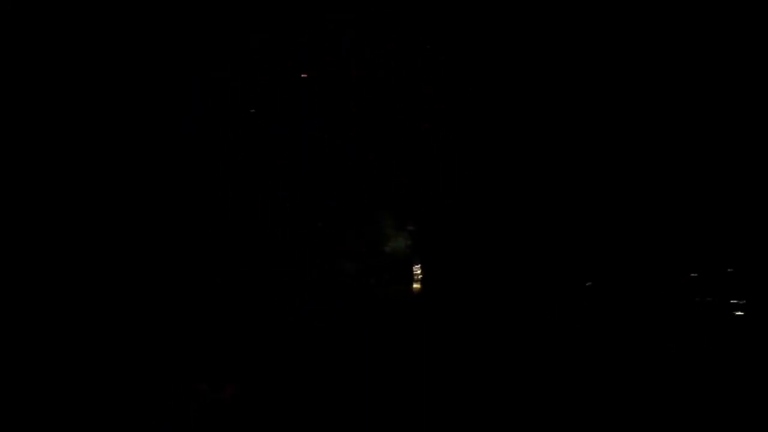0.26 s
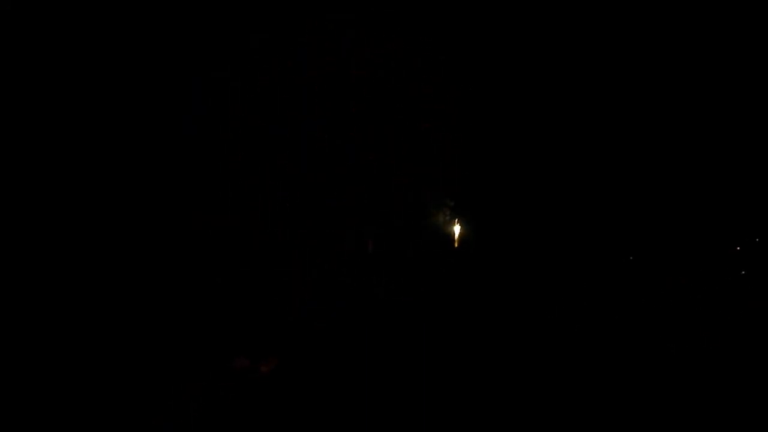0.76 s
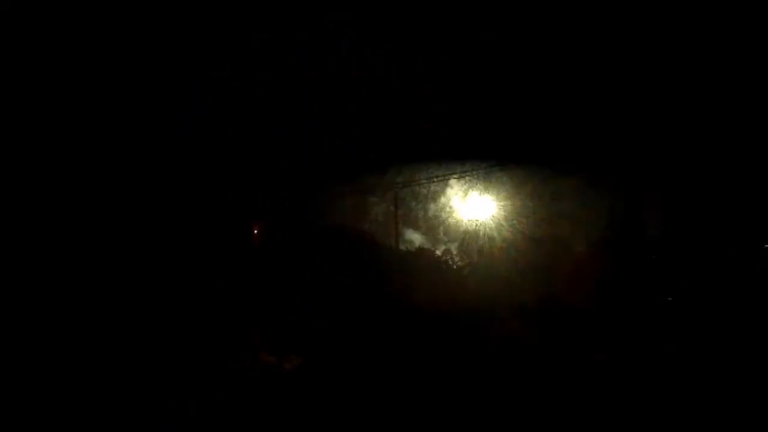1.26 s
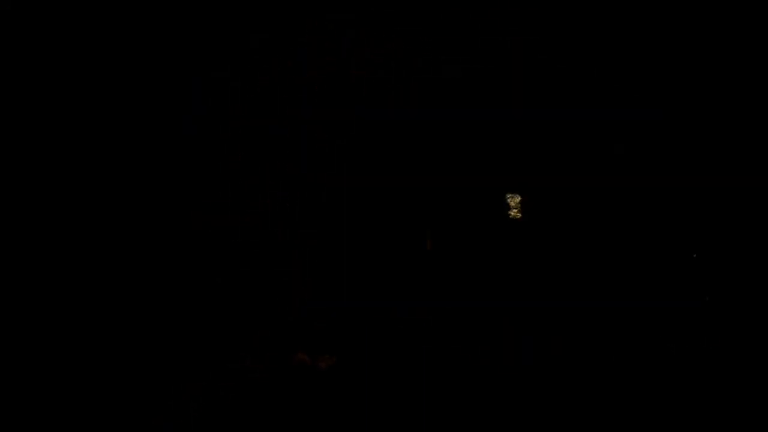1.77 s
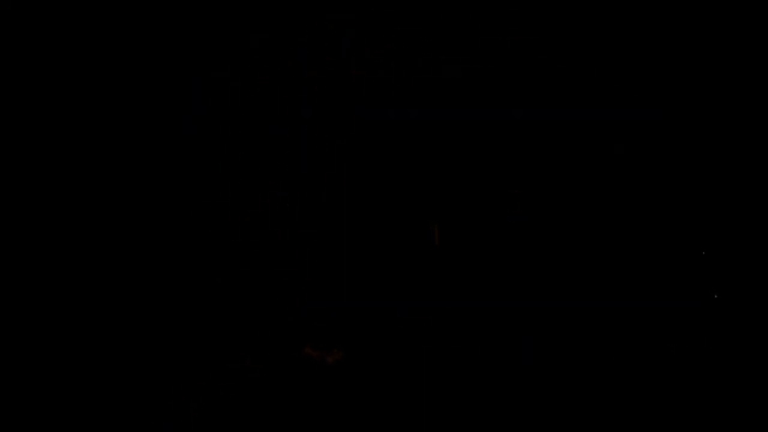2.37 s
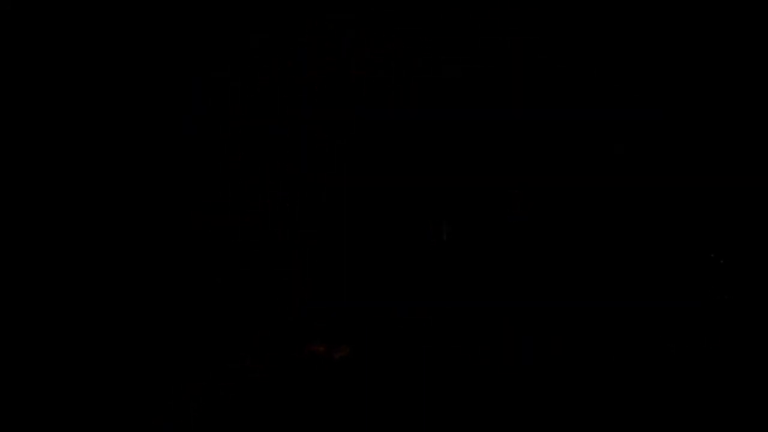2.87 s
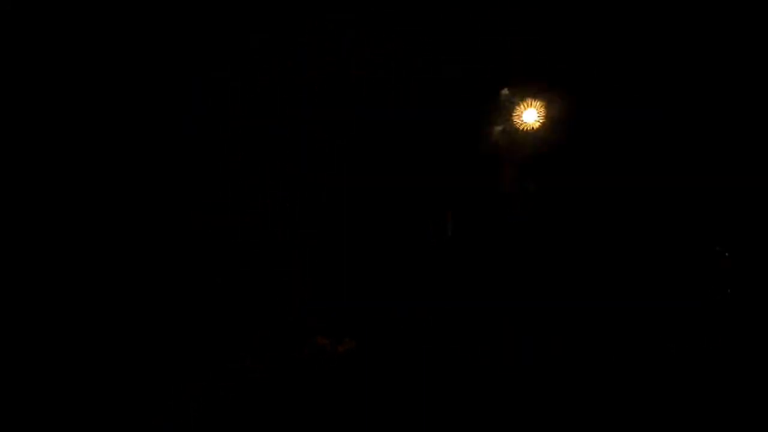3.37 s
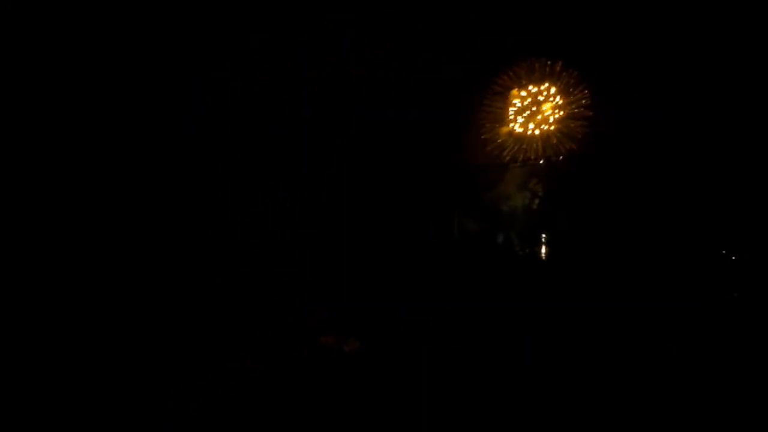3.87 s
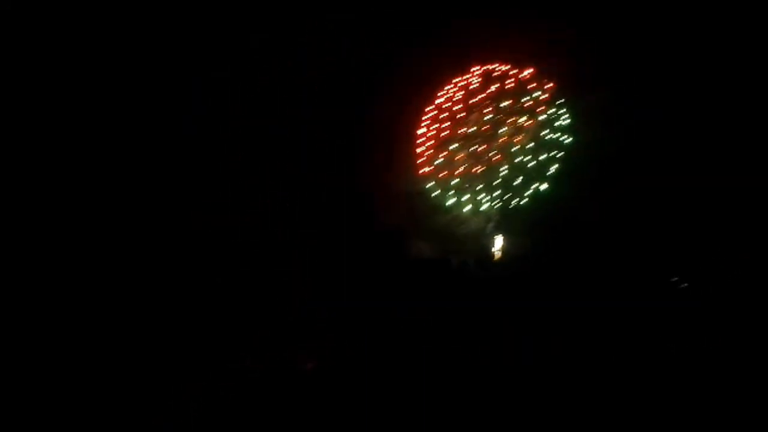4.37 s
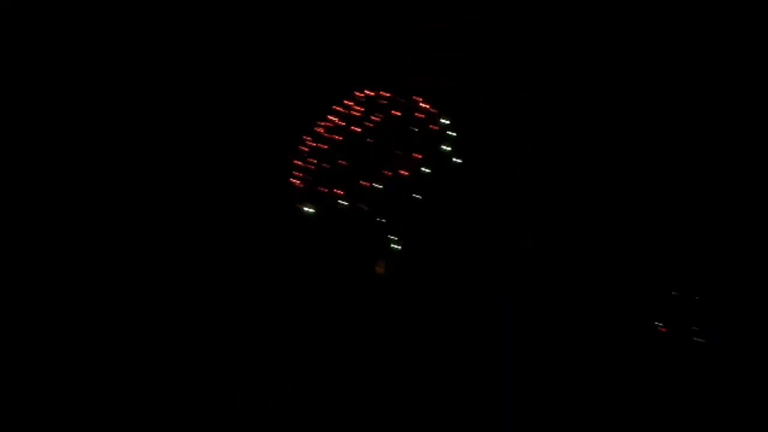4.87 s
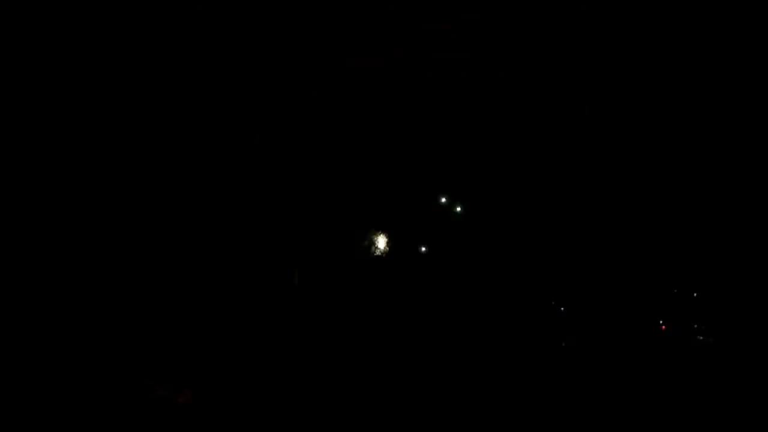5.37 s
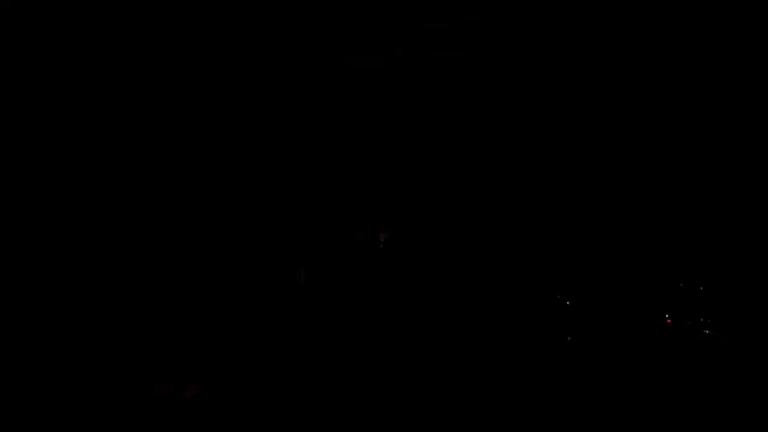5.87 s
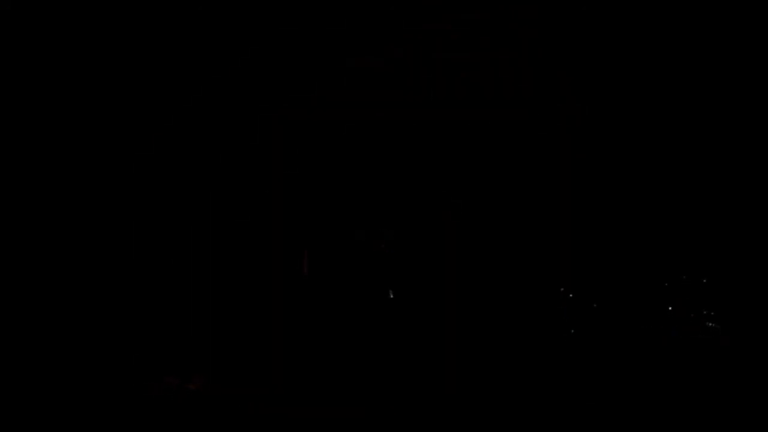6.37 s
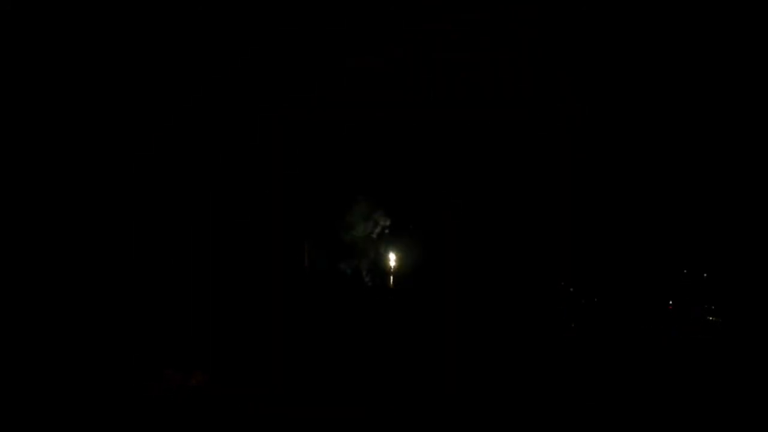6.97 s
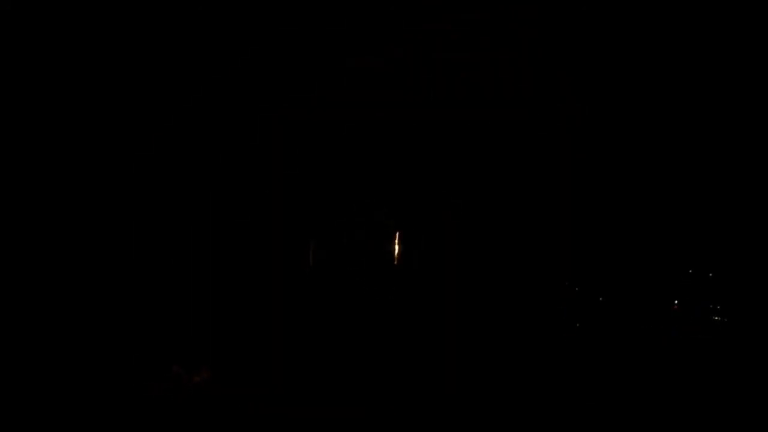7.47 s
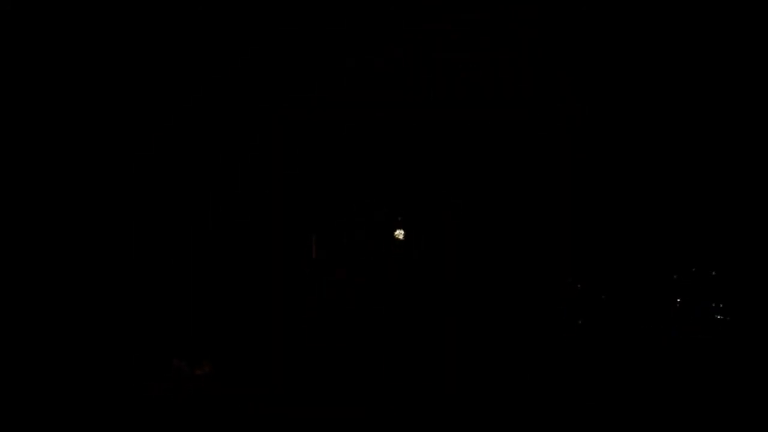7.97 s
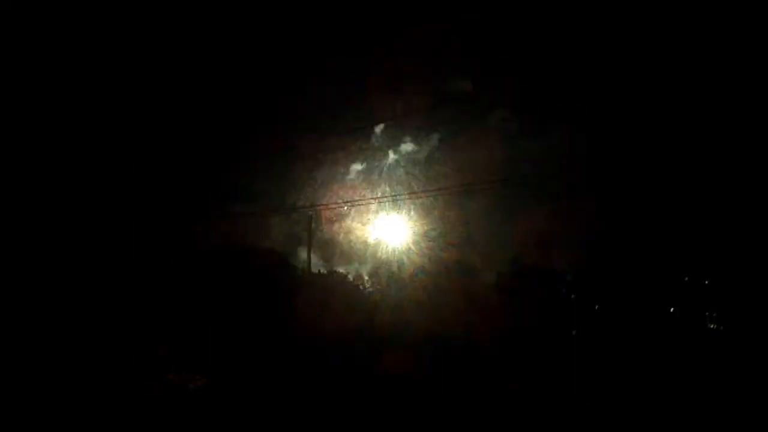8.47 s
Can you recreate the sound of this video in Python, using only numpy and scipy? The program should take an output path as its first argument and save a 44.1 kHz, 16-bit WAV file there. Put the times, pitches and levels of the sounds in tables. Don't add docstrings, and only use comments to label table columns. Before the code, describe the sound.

Over a rolling night rumble, one hard firework crack, then two dense volleys of sharp booms, each slapping off houses and fading into long echoes.

```python
import sys
import numpy as np
from scipy import signal
from scipy.fft import irfft
from scipy.io import wavfile
from scipy.ndimage import uniform_filter1d

SR = 44100
rng = np.random.default_rng(int(sys.argv[2]) if len(sys.argv) > 2 else 0)


def unload_wav(signal):
    wavfile.write(
        sys.argv[1],
        SR,
        np.round(np.clip(np.atleast_2d(signal).T, -1, 1) * 32767).astype(np.int16),
    )


def natural_amplitude(level_db):
    exponent = np.asarray(level_db, float) / 20
    return 10 ** exponent


N = 384111

# time [s], level [dB].
HISS_LEVEL = [(0.0, -83), (1.4, -82), (3.0, -79.5), (4.1, -83), (5.4, -80), (6.6, -77.5), (7.1, -83),
              (8.71, -83.5)]
# frequency [Hz], level [dB].
HISS_COLOUR = [(300, 7), (2000, 6.5), (4000, -3), (5500, -8), (8000, -3), (12000, -4), (15000, -2)]
# frequency [Hz], gain [dB].
MICROPHONE_RESPONSE = [(30, -32), (70, -13), (130, -1.5), (1500, 0), (2400, 2), (3300, -1.5), (5500, -6),
                       (8000, 3), (12000, -2), (16500, -12)]
# start [s], level against one near shell [dB],
# extra bass [dB], share of the usual ring time [ratio].
UNSEEN_BLASTS = [(-.3, 9.5, 1.5, 1.0), (1.45, -9, 0, 1), (1.67, -3.5, 10.5, 0.74), (2.1, -7.5, -0.5, 1),
                 (2.65, -8.5, 3.5, 1), (4.25, -3, 3, 0.99), (4.5, -1, 3, 0.12), (4.8, -5.5, -10, 0.41),
                 (5.3, -9, 2, 1), (6.16, 11.5, 13, .15), (5.8, -10, 8, 1)]
# frequency [Hz], level [dB].
ROLL_SPECTRUM = [(40, -6), (70, -11), (110, -2), (200, 11.5), (290, 3), (400, -10.5), (520, -6),
                 (650, -2.54), (800, -10.5), (1050, -14), (2000, -16.5), (4000, -29), (8000, -46.5),
                 (14000, -88)]
# frequency [Hz], time to fall 60 dB [s].
ROLL_RING = [(100, 3.1), (250, 5.24), (700, 6.9), (1800, 4.08), (4000, 2.7), (8000, 1.4)]
# frequency [Hz], likeness [0 to 1].
CAPSULE_LIKENESS = [(60, 0.99), (200, 0.98), (700, 0.82), (1500, 0.033), (4000, 0.11)]
# start [s], level [dB].
FAR_POPS = [(0.07, -30.5), (0.184, -33), (0.83, -46), (1.391, -43), (1.422, -26.5), (1.445, -29),
            (1.47, -26), (1.509, -24.5), (1.556, -24.5), (1.587, -26.5), (1.627, -31), (1.671, -23),
            (1.723, -24.5), (1.752, -34.5), (1.781, -34), (2.088, -33), (2.114, -37), (4.259, -25.5),
            (4.294, -24.5), (4.348, -27.5), (4.379, -24), (4.417, -25), (4.452, -26), (4.506, -24.5),
            (4.549, -22.5), (4.592, -25.5), (4.626, -26.5)]
# frequency [Hz], time to fall 60 dB [s].
HOUSE_RING = [(100, 0.99), (300, 0.56), (1000, 0.36), (3000, 0.46), (8000, 0.62), (11000, 0.67),
              (14000, 0.5)]
# time [s], level [dB].
CLOTH_LEVEL = [(.72, -100), (0.731, -64), (.79, -64), (.86, -101), (.9, -100)]
# start [s], treble [dB], body against the treble [dB].
RATTLES = [
    (2.4967, -59, -11),
    (2.5165, -56, -8),
    (3.1892, -52, -5.5),
    (5.993, -53, -2.5),
    (6.0006, -43.5, 5),
    (6.3504, -80, -35),
    (6.3704, -29, -19),
]
# start [s], strength [dB], ragged treble [dB], front rounded above [Hz].
BURSTS = [(1.285, -4.5, -25, 5510), (3.081, -6.5, -33.5, 4700), (3.128, -9.5, -31.5, 4770),
          (3.333, -10.5, -36, 4600), (3.37, -15, -29, 5000), (3.428, -14.5, -21.5, 5000),
          (3.474, -14.5, -38, 4840), (3.552, -15.5, -29, 5000), (3.602, -14, -27, 5500),
          (6.044, -10.5, -39, 4440), (6.314, -11, -25.5, 4940), (6.405, -11.5, -26, 5460),
          (6.546, -11, -30, 5140), (6.594, -7.5, -21.5, 5500), (6.624, -15, -23.5, 5460),
          (6.714, -15, -32, 5060), (6.737, -10, -25, 5500), (3.2979, -17, -53, 4000),
          (3.2997, -10, -26, 6200), (7.1746, -20.5, -76, 947)]
# delay [s], gain [ratio], dulled above [Hz], right capsule later by [s],
# left over right [dB].
SHOCK_PATHS = [(0, 1, 6500, .000145, 1.3), (.0017, .3, 5500, .0001, 2.5), (.0033, .27, 1100, .00001, .7),
               (.0052, .14, 1000, -.00005, 4), (.0113, .28, 3000, .00005, 1.3), (.0147, .15, 12000, 0, 1.5),
               (.0246, .04, 3000, .0001, 1), (.0288, .24, 2600, -.0001, 3), (.037, .05, 1500, .00003, 1),
               (.0445, .02, 2500, .00009, 0)]
# delay [s], gain [ratio], dulled above [Hz],
# right capsule later by [s], left over right [dB].
GROUND_PATHS = [(0, 1.05, 6500, .000145, 1.3), (.0288, .6, 2600, -.0001, 3), (.0445, -.3, 2500, .00009, 0)]


def evened(x):
    return x / np.sqrt(np.mean(x ** 2) + 1e-20)


def read(points, hz):
    f, value = np.transpose(points)
    return np.interp(np.log(hz + 1), np.log(f + 1), value)


def add(mix, s, sound):
    part = mix[round(s * SR):][:len(sound)]
    part += sound[:len(part)]


def band(x, hz, kind, order=2):
    return signal.sosfilt(signal.butter(order, np.clip(hz, 20, 20000), kind, fs=SR, output="sos"), x)


def through(x, response):
    return signal.oaconvolve(x[None], response, axes=1)[:, :N]


def causal(points, size=4096):
    hz = abs(np.fft.fftfreq(size, 1 / SR))
    log_gain = np.log(natural_amplitude(read(points, hz)))
    return np.fft.ifft(np.exp(np.conj(signal.hilbert(log_gain)))).real[:size // 2]


def blend(first, second, like):
    return np.array([first, like * first + np.sqrt(1 - like ** 2) * second])


def noise(db, same, size=1024):
    hop = size // 4
    hz = np.fft.rfftfreq(size, 1 / SR)[:, None]
    t = np.arange(N // hop + 5) * hop / SR
    a, b, c, d = rng.standard_normal((len(t), len(hz), 4)).T
    z = blend(a + 1j * b, c + 1j * d, np.clip(same(hz), 0, 1))
    return signal.istft(z * natural_amplitude(db(hz, t)), nperseg=size, noverlap=size - hop)[1][:, :N]


def hiss():
    def colour(hz, t):
        return read(HISS_COLOUR, hz) - 26 * (hz > 14400) + 0 * t

    level_db = 6 + np.interp(np.arange(N) / SR, *np.transpose(HISS_LEVEL))
    return natural_amplitude(level_db) * evened(noise(colour, lambda hz: 0 * hz))


def roll():
    rise_s, half_frame_s = 0.061, 256 / SR
    # 0.6 dB per dB, with 1.56 dB extra bass
    blasts = [(s, 0.6 * (db + 13), 1.56, 1) for s, db, *_ in BURSTS] + UNSEEN_BLASTS

    def field(hz, t):
        lumps = rng.standard_normal((len(t), len(hz))).T
        lumps = uniform_filter1d(lumps, 8, 0)
        lumps = evened(uniform_filter1d(lumps, 6, 1))
        power = np.full((len(hz), len(t)), 1e-9)
        for s, db, bass_db, share in blasts:
            after = np.searchsorted(t, s + half_frame_s)
            age = t[after:] - half_frame_s - s
            bass = bass_db / (1 + (hz / 250) ** 2)
            level_db = db + bass - 60 * age / (share * read(ROLL_RING, hz))
            swell = 1 - np.exp(-(age / rise_s) ** 2)
            power[:, after:] += swell * natural_amplitude(2 * level_db)
        return read(ROLL_SPECTRUM, hz) + 1.5 * lumps + 10 * np.log10(power)

    left, right = evened(noise(field, lambda hz: read(CAPSULE_LIKENESS, hz), size=512))
    return natural_amplitude(-46.5) * np.array([natural_amplitude(0.08) * left, np.roll(right, 2)])


def street(x):
    sparse = rng.standard_normal((2, SR)) * (rng.random((2, SR)) < .06)
    hz, t, z = signal.stft(sparse, SR, nperseg=256)
    z = blend(z[0], z[1], np.clip(read(CAPSULE_LIKENESS, hz), 0, 1)[:, None])
    decay = natural_amplitude(-60 * t / read(HOUSE_RING, hz)[:, None])
    tail = signal.istft(z * decay, SR, nperseg=256)[1]
    tail = tail * np.minimum(np.arange(tail.shape[1]) / SR / 0.0013, 1)
    return through(x, tail / np.linalg.norm(tail[0]))


def shock(length_s, relax_s, front_hz):
    t = np.arange(600) / SR
    fall = 1 - 1.6 * np.minimum(t / length_s, 1)
    rest = np.exp(-(np.maximum(t - length_s, 0) / relax_s) ** 2)
    return band(fall * rest, front_hz, "low", order=3)


def pops():
    out, t = np.zeros(N), np.arange(1500) / SR
    thump = natural_amplitude(-12.5 - 60 * t / 0.042) * np.sin(2 * np.pi * 220 * t)
    dull = band(shock(0.00076, 0.0013, 870), 940, "low")
    dull = band(dull, 640, "high")
    for s, db in FAR_POPS:
        add(out, s + 0.00308, natural_amplitude(db) * thump)
        add(out, s + 0.00069, natural_amplitude(db + 3) * dull)
    return out * natural_amplitude([[1.5], [-1.5]]) + natural_amplitude(-3.5) * street(out)


def handling():
    t, out = np.arange(400) / SR, np.zeros((2, N))
    for s, db, body_db in RATTLES:
        body = natural_amplitude(body_db) * np.sin(2 * np.pi * 1600 * t) * np.exp(-t / 0.00086)
        for side in out:
            scrape = band(rng.standard_normal(400), 3500, "high") * np.exp(-t / 0.00056)
            add(side, s + 0.0011, natural_amplitude(db) * (scrape + body))
    cloth = band(rng.standard_normal((2, N)), 1600, "high")
    cloth = band(cloth, 8700, "low")
    return out + cloth * natural_amplitude(np.interp(np.arange(N) / SR, *np.transpose(CLOTH_LEVEL)))


def paths(table, brighter=1):
    hz, out = np.fft.rfftfreq(4096, 1 / SR), 0
    for delay, gain, dull_hz, right_s, pan_db in table:
        late = delay + .001 + np.array([[0], [right_s]])
        sides = gain * natural_amplitude([[pan_db / 2], [-pan_db / 2]])
        dulling = 1 + 1j * hz / dull_hz / brighter
        out = out + sides * np.exp(-2j * np.pi * hz * late) / dulling
    return irfft(out)


def shells():
    shocks, rags, edges, booms = np.zeros((4, N))
    t = np.arange(3000) / SR
    wave = np.sin(2 * np.pi * 118 * t) * natural_amplitude(-60 * t / .021)
    yard = np.sin(2 * np.pi * 185 * t) * natural_amplitude(-60 * t / .035)
    for s, db, sharp_db, front_hz in BURSTS:
        length_s = .001 + .00004 * rng.standard_normal()
        rag = band(rng.standard_normal(600), 2200, "high")
        rag = band(rag, 2.5 * front_hz, "low", order=3)
        add(shocks, s, natural_amplitude(db + 3) * shock(length_s, .0023, front_hz))
        add(rags, s, natural_amplitude(db + sharp_db + 16) * rag * np.exp(-t[:600] / .0007))
        add(edges, s, natural_amplitude(db + sharp_db + 25.5) * np.ones(1))
        add(booms, s + .0026, natural_amplitude(db + 3) * wave)
        add(booms, s + .0312, natural_amplitude(db - 8) * yard)
    near = through(shocks, paths(SHOCK_PATHS))
    near = near + through(rags, paths(SHOCK_PATHS, brighter=1.27))
    near = near + through(booms, paths(GROUND_PATHS))
    edges = band(band(edges, 3300, "high"), 7300, "low", order=4)
    return near + natural_amplitude(-8.5) * street(shocks + .5 * booms + edges)


def scene():
    return roll() + pops() + handling() + shells()


def low_pass(x):
    return signal.sosfilt(signal.butter(12, 16820, fs=SR, output="sos"), x)


def record(dry):
    x = signal.oaconvolve(dry, causal(MICROPHONE_RESPONSE)[None], axes=1)[:, :N]
    x = x + hiss()
    cross_delay = 15
    x = x - np.pad(x[::-1], ((0, 0), (cross_delay, 0)))[:, :N]
    power = signal.lfilter([.005], [1, -.995], (x ** 2).mean(0))
    power_db = 10 * np.log10(abs(power) + 1e-12)
    fall = np.arange(N) * 23.0 / SR
    held_db = np.maximum.accumulate(power_db + fall) - fall
    over_db = np.maximum(held_db + 21.5, 0)
    x = band(x, 16300, "low", order=14)
    x = np.clip(x / natural_amplitude(0.42 * over_db), -.495, .495)
    return low_pass(x)


dry = scene()
out = record(dry)
unload_wav(out)
```